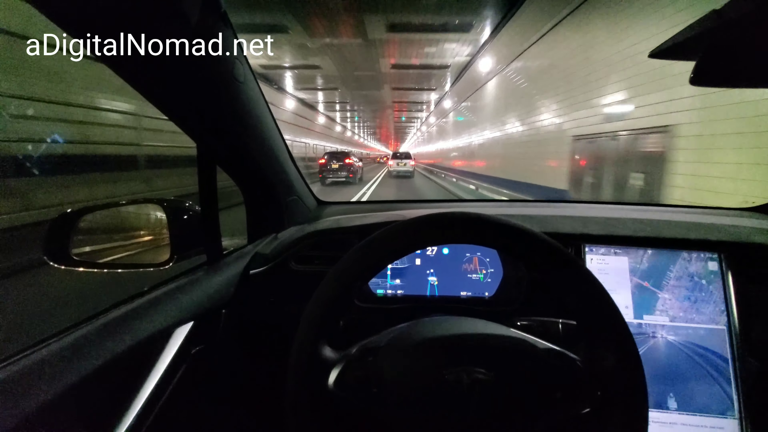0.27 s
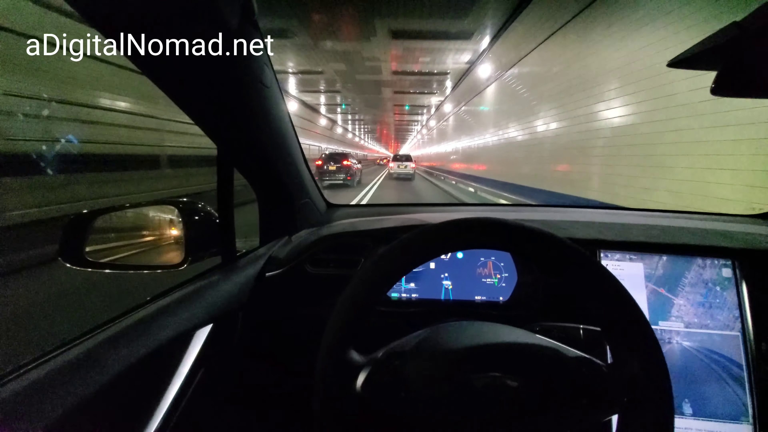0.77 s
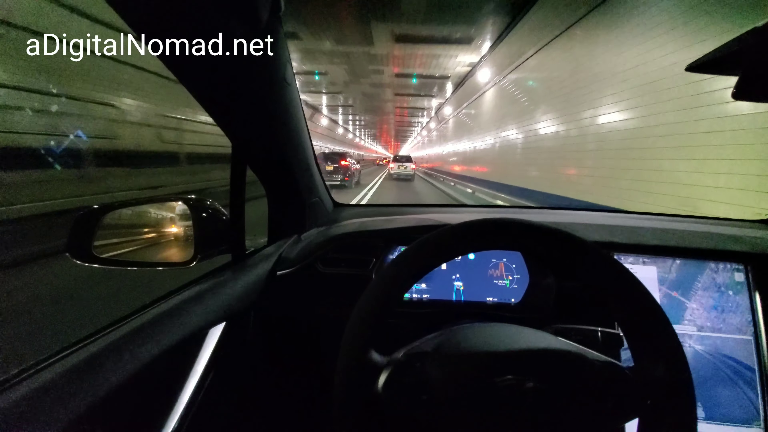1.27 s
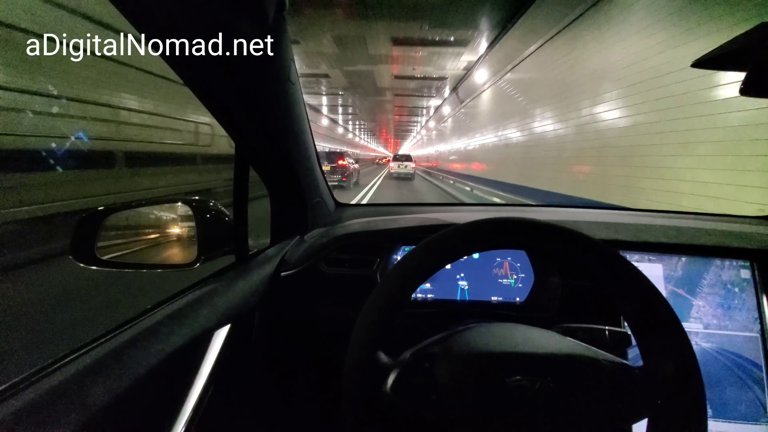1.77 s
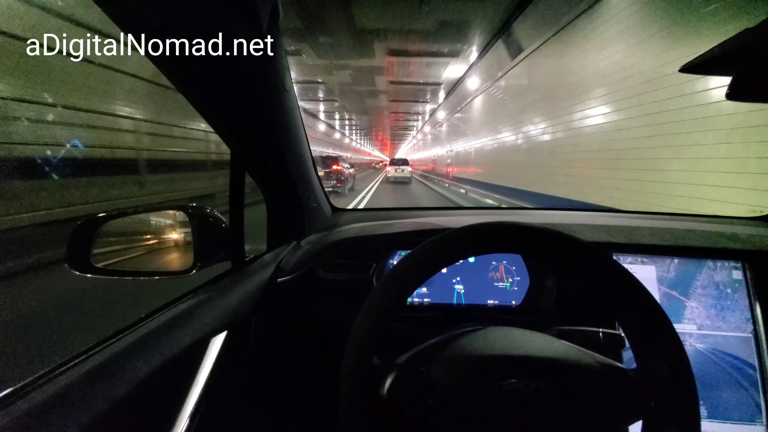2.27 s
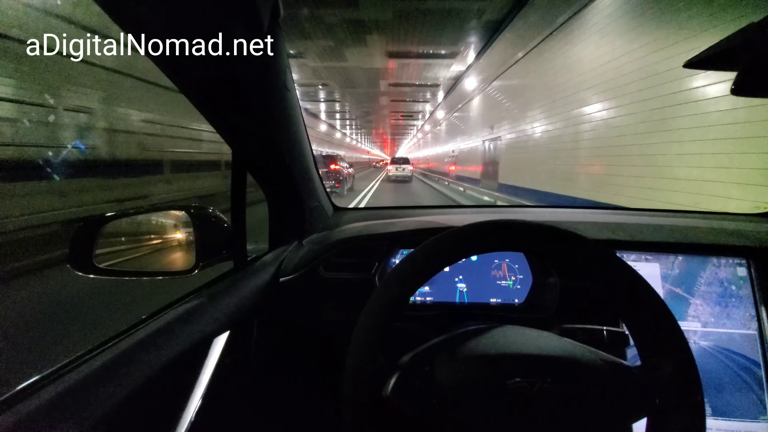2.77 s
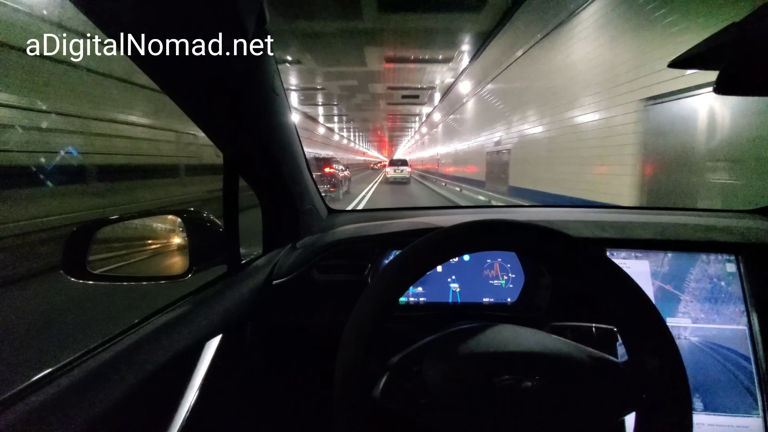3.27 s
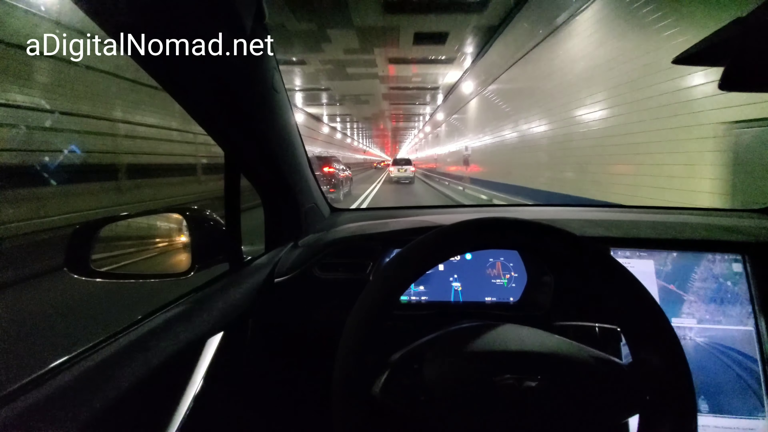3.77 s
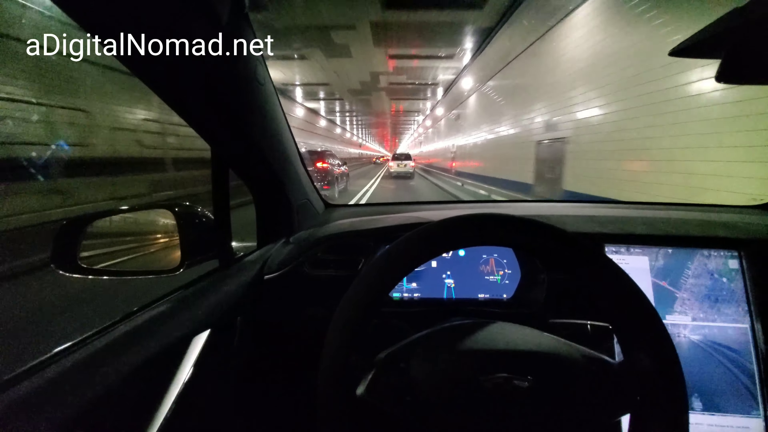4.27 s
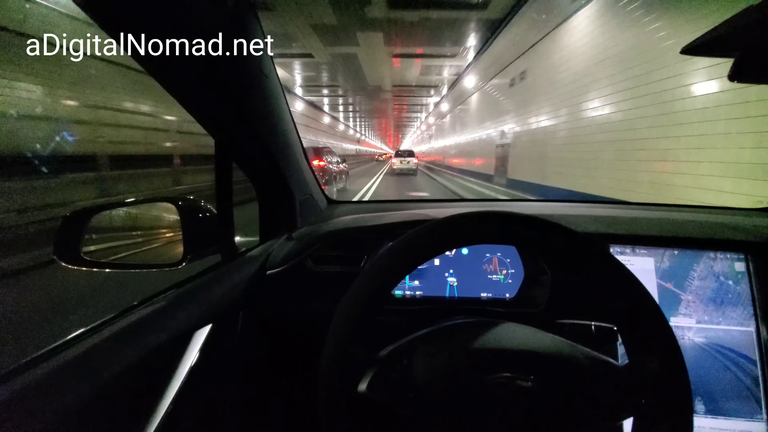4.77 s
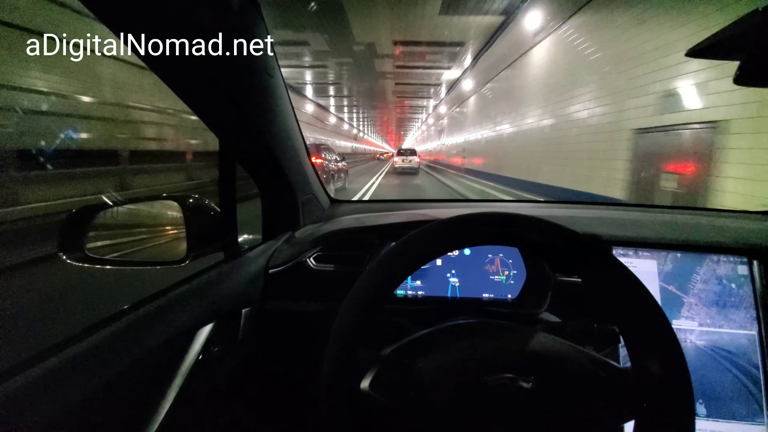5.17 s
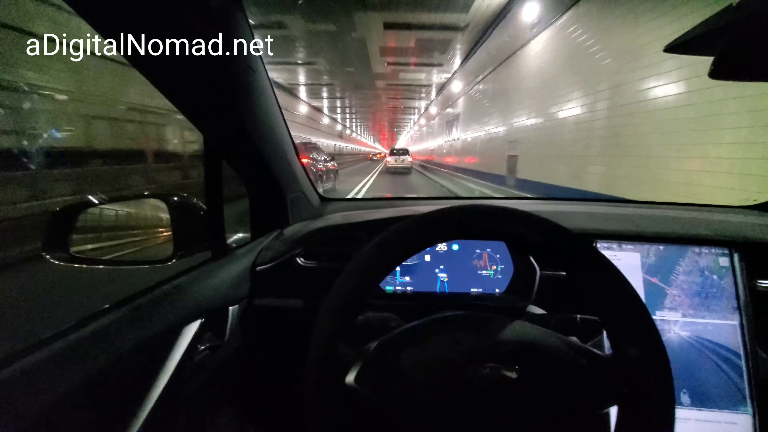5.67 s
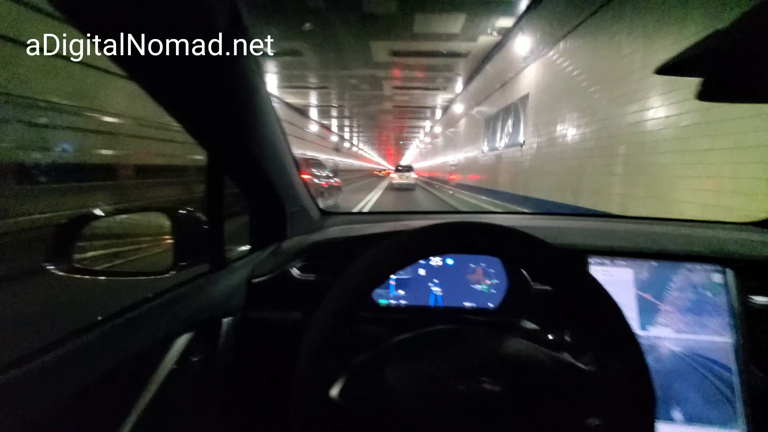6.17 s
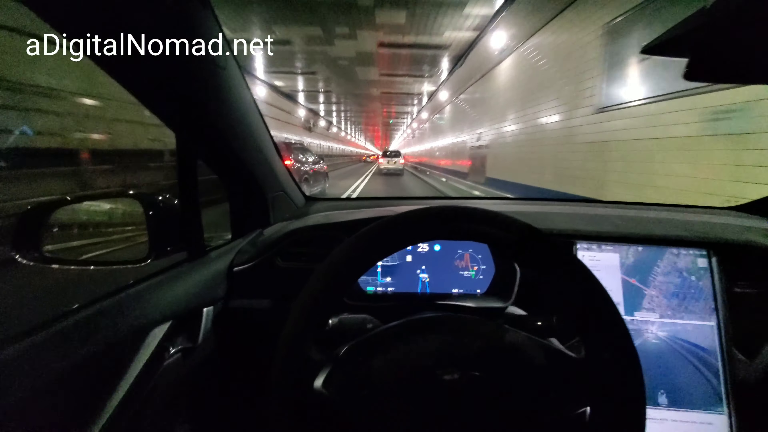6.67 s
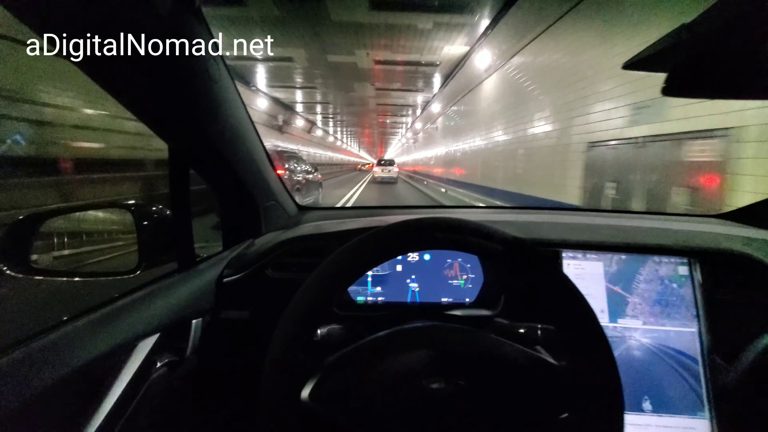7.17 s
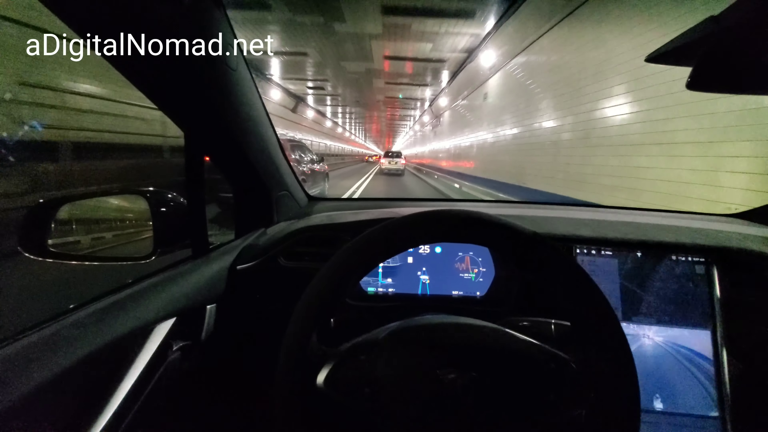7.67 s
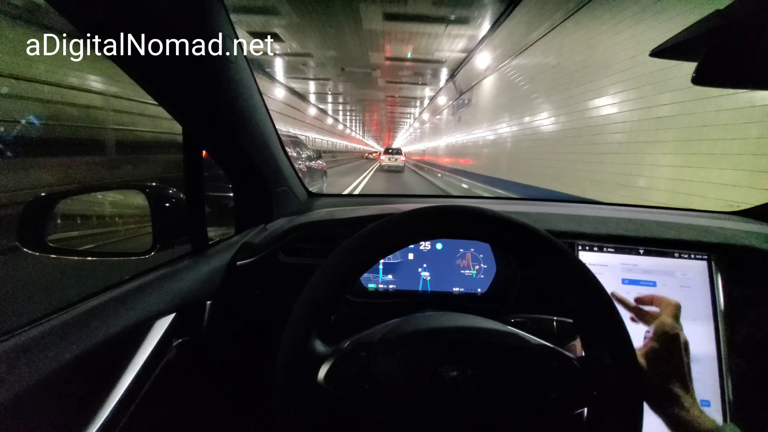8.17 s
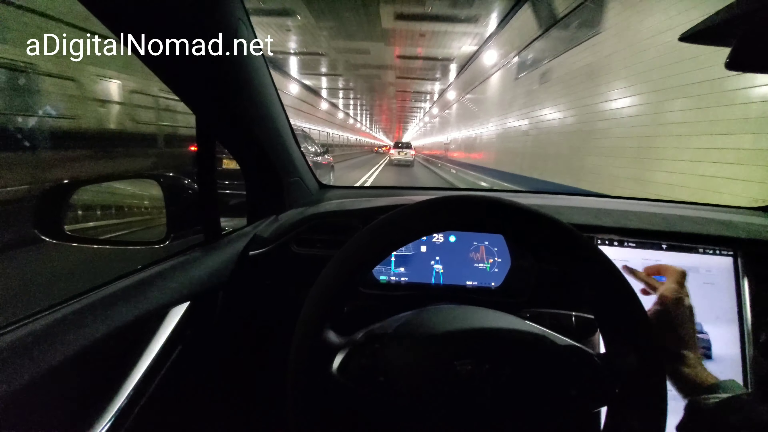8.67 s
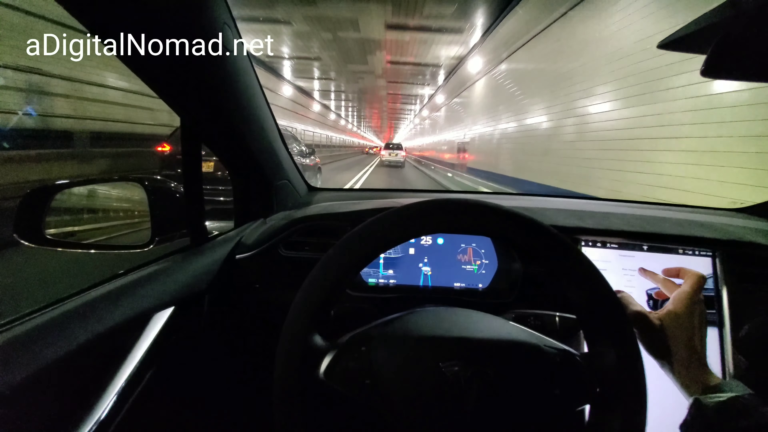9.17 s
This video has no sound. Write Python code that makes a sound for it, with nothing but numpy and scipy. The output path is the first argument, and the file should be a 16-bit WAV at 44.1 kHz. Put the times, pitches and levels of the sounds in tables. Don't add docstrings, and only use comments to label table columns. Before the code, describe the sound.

Inside the cabin of a quiet electric car rolling steadily through a tunnel. A deep, uneven rumble starts strongly and eases within half a second; under it a low hum near 105 Hz wavers, with faint higher tones, while soft muffled tyre roar reflects off the walls. Faint damp hiss comes and goes. A small low bump falls at 2.5 s. At 4.65 to 5.1 s front and rear wheels cross a loose steel cover: two short metallic rattles with a low thud. At 5.56 to 6.0 s a hard joint gives the loudest moment, clustered deep thumps with dull slaps and wet hiss. Sharp plastic ticks snap near the right side at 6.22 s, followed by a brief cloth brush. A lighter cover knocks and chatters twice from 6.5 to 7 s, ringing away. Hum and rumble continue, rising slightly in pitch, until 9.4 s.

```python
import sys
import numpy as np
from scipy import signal
from scipy.io import wavfile
from scipy.ndimage import uniform_filter1d

SR = 44100
rng = np.random.default_rng(int(sys.argv[2]) if len(sys.argv) > 2 else 0)


def volts_from_decibels(level):
    exponent = np.asarray(level, float) / 20
    return 10 ** exponent


def unload_wav(signal):
    wavfile.write(
        sys.argv[1],
        SR,
        np.round(np.clip(np.atleast_2d(signal).T, -1, 1) * 32767).astype(np.int16),
    )


N = 415422

# f/Hz, density/dB
DEEP = [(11, -39.5), (18, -13), (38, 6.5), (64, -5), (83, -32.5), (140, -120)]
BOOM = [(35, -33), (60, -2), (80, 2), (112, -6.5), (151, -3), (183, -21), (220, -16.5), (290, -44),
        (480, -120)]
ROAR = [(100, -31.5), (170, -3), (252, -5), (280, 2.5), (312, -10.5), (372, -6.5), (469, -12.5),
        (574, -12.5), (666, -19.5), (815, -14.5), (1290, -19.5), (1940, -22), (3240, -29.5), (4300, -39),
        (5590, -74), (9460, -120)]
HISS = [(4000, 2.5), (4500, -8.5), (6500, -7), (7800, -7.5), (8700, -7.5), (10500, -7.5), (12800, -6),
        (14700, 0), (16500, -3)]
RATTLE = [(820, -45.5), (1400, 0.5), (1510, -2.5), (2280, -0.5), (3060, -3.5), (4000, -9), (5200, -57),
          (8800, -120)]
DULL = [(110, -27), (180, 2.5), (296, -8.5), (407, 3.5), (504, -10), (623, -2.5), (1500, -12.5),
        (1950, -38), (3300, -120)]
BRIGHT = [(2290, -42.5), (3900, 0.5), (5430, 2), (6010, -1), (7760, -32), (8000, -21), (10400, -48),
          (17600, -120)]
RUB = [(1470, -32), (2500, -7), (2760, -7), (4790, -10), (6270, -11), (9480, -6), (15600, -22)]
SELF_NOISE = [(4000, -3), (6900, -1), (7600, -5.5), (8500, -1.5), (11000, -9.5), (14700, -1), (16500, 0.5)]
# f/Hz, left-right likeness/1
LIKENESS = [(30, .999), (45, 0.98), (70, 0.99), (130, 1), (290, 0.76), (450, 0.68), (740, 0.35),
            (1250, -0.42), (1900, 0.11), (3100, 0.025), (6820, -0.063), (15000, 0.32)]
# f/Hz, L-R level/dB
LEAN = [(60, -0.5), (130, 3), (290, 1), (640, 2), (1410, 2.5), (3100, -0.5), (6820, 5), (10000, -3.5),
        (15000, 4.5)]

# t/s, level/dB
ROAD = [(0.0, -38), (0.44, -33), (0.66, -35.5), (1.49, -33.5), (2.2, -33.5), (2.86, -31), (3.04, -36),
        (3.28, -34), (4.5, -33.5), (4.91, -31), (5.6, -33), (6.2, -36), (6.79, -31.5), (7.22, -40),
        (7.63, -35.5), (7.92, -38), (8.55, -32), (9.42, -35)]
# t/s, level/dB
WALLS = [(0.0, -40.5), (1.9, -40.5), (2.9, -39), (4.1, -40), (5.3, -37.5), (6.4, -43), (7.2, -41.5),
         (9.42, -41)]
# f/Hz, width/Hz, level/dB
ROAR_PEAKS = [(742, 130, 5.5), (1840, 590, 1.5), (2410, 130, -2), (3020, 140, 2)]
# t/s, level/dB
HEAVE = [(0.0, -14.5), (0.13, -31), (0.39, -17), (0.68, -19), (2.41, -24), (3.07, -29), (3.3, -22),
         (3.7, -25), (3.93, -27), (4.48, -28), (4.72, -29), (5.27, -24), (5.67, -15.5), (5.87, -16),
         (5.98, -12.5), (6.48, -24.5), (7.63, -24.5), (8.05, -25.5), (8.55, -24), (8.84, -28.5),
         (9.08, -38.5)]
# start t/s, hiss level/dB, length/s
DAMP = [(0.64, -63, .1), (0.8, -60.5, 0.37), (1.3, -63, 0.16), (1.81, -75, .1), (3.3, -75, 0.3),
        (3.95, -70.5, 0.36), (4.5, -70, 0.75), (5.59, -58.5, 0.33), (5.95, -62, 0.94), (7.18, -69.5, 0.076),
        (7.4, -63.5, 0.39), (7.95, -67.5, 0.72), (8.8, -72.5, 0.3)]
# t/s, hiss level/dB
PUDDLES = [(0.39, -72), (2.2, -76), (3.01, -68), (3.28, -76), (3.65, -67), (4.5, -65.5), (4.8, -64),
           (5.19, -70), (5.59, -61.5), (5.82, -54), (6.205, -56), (8.46, -62.5), (8.65, -63)]

# t/s, f/Hz
SPEED = [(0, 35.7), (1.8, 35.6), (2.6, 35.4), (4.0, 35.1), (5.8, 35.0), (6.4, 35.6), (7.0, 36.3),
         (8.0, 36.8), (8.3, 37.3), (8.9, 37.8), (9.42, 38.6)]
# t/s, 3rd order level/dB
HUM = [(0.0, -23), (0.5, -21), (1.15, -22.5), (1.78, -28.5), (2.3, -35.5), (2.54, -25.5), (2.9, -37),
       (3.7, -28.5), (4.17, -30), (4.55, -45.5), (5.45, -27.5), (6.19, -30), (6.75, -36), (6.87, -27.5),
       (7.48, -21.5), (8.21, -26), (8.58, -33), (9.42, -32)]
# t/s, level/dB, length/s
JOLTS_3RD = [(3.02, -27, .03), (4.732, -26.5, 0.02), (5.588, -31, 0.026), (5.872, -22, .05),
             (7.865, -21, 0.019)]
JOLTS_4TH = [(0.08, -24, 0.042), (0.5, -31.5, 0.083), (1.28, -32, 0.47), (2.8, -26.5, 0.024),
             (3.3, -29.5, .1), (3.68, -34.5, .12), (4.25, -26.5, .03), (4.72, -30.5, 0.64),
             (5.85, -37, .05), (6.79, -30.5, 0.21), (7.82, -28.5, .05), (8.1, -40, 0.032),
             (8.26, -26, 0.069), (8.8, -31, 0.41)]
JOLTS_8TH = [(0.5, -39, 0.044), (1.15, -37, 0.028), (2.13, -40.5, 0.12), (2.3, -38, 0.045),
             (2.939, -41.5, 0.016), (3.15, -32.5, 0.28), (4.07, -37, 0.019), (6.64, -45, 0.041),
             (8.1, -40, 0.14), (8.58, -41.5, 0.045)]
# level/dB, rate/(1/s)
WOBBLES = [
    (2.0, 7),
    (3.5, 10),
    (2, 7.9),
]
# start t/s, level/dB, length/s
RINGING = [(0.37, -49, 0.49), (1.39, -49.5, 0.088), (2.8, -44.5, 0.55), (4.95, -41.5, 0.16),
           (5.61, -48.5, .05), (7.6, -49, 1), (8.58, -45, .85)]
# f/Hz, width/Hz
RING_MODES = [(377, 16)]

# t/s, peak level/dB, fall time/s
SLAPS = [
    (5.563, -32, 0.012),
    (5.631, -38.5, 0.012),
    (5.829, -30.5, 0.01),
    (5.932, -41, .005),
    (8.465, -49, .008),
]
# t/s, ring level/dB, ring f/Hz, crack level/dB, L-R level/dB
TICKS = [(6.2165, -40, 10500, -44, -12), (6.2272, -24, 9000, -23, -13), (6.2300, -33, 2200, -48, -6),
         (6.2347, -34, 9500, -29, -12), (6.2361, -19, 2200, -28, -9), (6.2362, -25, 4700, -38, -9),
         (6.2364, -36, 600, -34, -9), (6.2542, -29, 1300, -28, -9)]
# t/s, level/dB
BRUSH = [(6.222, -70), (6.232, -56), (6.242, -51), (6.252, -43), (6.265, -40), (6.273, -44), (6.276, -60)]

# edge t/s, peak t/s, rattle level/dB, dull share/dB, bright share/dB
COVERS = [
    [(4.645, 4.73, -34.5, 2.5, -17.5), (4.87, 4.99, -39, 7, -16)],
    [(6.53, 6.64, -39.5, 9.5, -13), (6.86, 6.95, -41, 2, -23)],
]
# f/Hz, width/Hz, front axle level/dB, rear axle level/dB, fade/(dB/s)
COVER_PEAKS = [
    [(416, 51, 7, 6, -3), (604, 55, 5, 10, 13), (686, 55, 7.5, 4.5, 2.5), (1015, 49, 13, 9, 26),
     (1240, 35, 12.5, 9.5, 33), (1520, 60, 5, 10.5, 17), (1948, 95, 10.5, 13.5, 2), (2120, 86, 5, 6, 7),
     (2540, 160, 7.5, 8.5, -3), (2900, 33, 4, 10, 35), (3056, 150, 14, 15, 26), (3670, 140, 3.5, 7.5, 18),
     (6000, 80, 6, 7, 24)],
    [(673, 60, -2, 8.5, 20), (856, 80, 5, -2, 27), (1060, 88, 8, -2, 60), (1200, 14, -1, 15, 2),
     (1500, 60, -2, 8.5, 9), (1930, 130, 11.5, 10, -2), (2470, 41, 16, 10.5, 31), (2634, 57, 11, 8.5, -2),
     (2810, 55, 7, 9, 6), (3020, 78, 0, 9.5, 20), (3540, 150, 4, 5, 12.5), (4340, 50, 13, 6, 40),
     (5110, 50, 11, 5, 60), (5880, 98, 10, 14, 60)],
]
REAR_AXLE_S = [4.86, 6.82]
# front climb/(dB/s), rear climb/(dB/s)
PEAKS_CLIMB_DB_PER_S = ((3, 23), (63, 40))
# loss/dB, fall/(dB/s)
ECHOES = [
    [(4, 31), (0.5, 35)],
    [(3.5, 29), (2, 29)],
]

# t/s, peak level/dB, f/Hz, t60/s
BLOWS = [(2.49, -20.5, 70, .6), (4.729, -16.5, 100, 0.15), (5.029, -9.5, 105, 0.1),
         (5.564, -7, 62.6, 0.088), (5.59, -6, 101.3, 0.13), (5.652, -1, 55.5, 0.056),
         (5.804, -36, 82.6, 0.14), (5.832, -9, 58.3, 0.15), (5.856, -5.5, 79.3, 0.2),
         (5.918, -6, 56.5, 0.37), (5.965, -2.5, 50.2, 0.085), (6.875, -15.5, 110.7, 0.24),
         (6.905, -14, 107.4, 0.28)]
# t/s, peak level/dB, f/Hz, t60/s
KNOCKS = [(6.529, -22.5, 166, 0.23), (6.515, -39, 530, 0.13), (6.575, -27, 262, 0.14),
          (6.789, -20.5, 158, 0.3), (6.795, -34, 602, 0.28), (6.795, -46, 1130, .06),
          (7.263, -43, 890, 0.027)]

ROAR_FOLLOWS, HEAVE_FOLLOWS = 0.033, 0.13
GLASS_CUT_HZ = 3670
HEAVE_REST_DB, HEAVE_RISE_DB_PER_S, HEAVE_FALL_DB_PER_S = -32, 111, 140
DAMP_RISE_DB_PER_S, DAMP_FALL_DB_PER_S = 75.5, 85.5
PUDDLE_RISE_DB_PER_S, PUDDLE_FALL_DB_PER_S = 249, 193

ORDERS_HEARD, ORDER_SHARES_DB = (3, 4, 8), (-0.4, -2.5, -8.0)
REST_4TH_DB, REST_8TH_DB = -46, -45
JOLT_RISE_DB_PER_S, JOLT_FALL_DB_PER_S = 90, 72.5
PORT_LAG_RAD = 0.08
RING_REST_DB, RING_RISE_DB_PER_S, RING_FALL_DB_PER_S = -51, 41, 22

COVER_BEFORE_S, COVER_AFTER_S = 0.18, 0.65
EDGE_LOSSES_DB, EDGES_DB_PER_S = (8, 2), (1000, 450)
DULL_LEADS_S, DULL_FADES_DB_PER_S = (0.0065, 0.05), (7, 70)
DULL_EDGE_LOSS_DB, DULL_ECHO_LOSS_DB = 4.5, 3.5
BRIGHT_EDGE_LOSS_DB, BRIGHT_DIES_DB_PER_S = 11, 15.5
FALLS_DB_PER_S, HOLDS_S = (58, 52), (0.0085, 0.04)

KNOCK_LEAN_DB, TRIM_DB = 5, 4.5
SELF_NOISE_DB, CUTOFF_HZ = -74.5, 15480
PORT_DIP, PORT_DIP_HZ = 0.4, 7600
GAIN_KNEE_DB, GAIN_SQUEEZE, GAIN_WINDOW_S = -16.5, 1.02, 0.19
GAIN_ATTACK_S, GAIN_RELEASE_DB_PER_S = 0.12, 9


def rms_one(x):
    return x / np.sqrt(np.mean(x ** 2) + 1e-20)


def in_time(rows):
    s, *columns = np.transpose(rows)
    return [np.interp(np.arange(N) / SR, s, c) for c in columns]


def span_of(start_s, end_s):
    span = slice(int(start_s * SR), int(end_s * SR))
    return span, signal.windows.tukey(span.stop - span.start, 0.12)


def swells(rows, rise_db_per_s, fall_db_per_s, rest_db=-120):
    t = np.arange(0, N + 64, 64) / SR
    power = volts_from_decibels(2 * (rest_db + 0 * t))
    for s, db, *hold in rows:
        rise_db = rise_db_per_s * np.maximum(s - t, 0)
        fall_db = fall_db_per_s * np.maximum(t - s - sum(hold), 0)
        power = power + volts_from_decibels(2 * (db - rise_db - fall_db))
    return np.interp(np.arange(N) / SR, t, 10 * np.log10(power))


def at_hz(points, hz):
    f, value = np.transpose(points)
    return np.interp(np.log(hz), np.log(f), value)


def drift(rate, size):
    r = np.exp(-80 * np.pi * rate / SR)
    sparse = rng.standard_normal(size // 40 + 2002)
    slow = signal.lfilter([1], [1, -2 * r, r * r], sparse)[2000:]
    return np.interp(np.arange(size) / 40, np.arange(len(slow)), rms_one(slow))


def resonance(x, hz, width_hz):
    r = np.exp(-np.pi * width_hz / SR)
    zeros = np.array([1, 0, -1]) * (1 - r * r) / 2
    return signal.lfilter(zeros, [1, -2 * r * np.cos(2 * np.pi * hz / SR), r * r], x)


def with_peaks(x, peaks):
    for hz, width_hz, db in peaks:
        x = x + (volts_from_decibels(db) - 1) * resonance(x, hz, width_hz)
    return rms_one(x)


def panned(half_db):
    return volts_from_decibels(np.array([[half_db], [-half_db]]))


def sides(mid, side, hz):
    alike = np.clip(at_hz(LIKENESS, hz), -1, 1)
    stereo = np.sqrt(1 + alike) * mid + np.sqrt(1 - alike) * side * [[1], [-1]]
    return stereo * panned(at_hz(LEAN, hz) / 2)


def cabin_noise(spectrum, patchy_db, flicker, size=N):
    low_hz, top_hz = spectrum[0][0], min(spectrum[-1][0], 0.45 * SR)
    edges = np.geomspace(low_hz, top_hz, 2 + int(4 * np.log2(top_hz / low_hz)))
    white = rng.standard_normal((2, 2, size + 8000))
    together = drift(flicker / 4, size)
    out = 0
    for k, (low, high) in enumerate(zip(edges, edges[1:])):
        hz = np.sqrt(low * high)
        if at_hz(spectrum, hz) < -75:
            continue
        band = signal.butter(2, [low, high], "band", fs=SR, output="sos")
        mid, side = signal.sosfilt(band, white[k % 2])[:, 8000:]
        gain = volts_from_decibels(at_hz(spectrum, hz) + patchy_db * (0.92 * together + drift(flicker, size)))
        out = out + gain * sides(mid, side, hz)
    return rms_one(out)


def road():
    boom_db, = in_time(ROAD)
    swing_db = boom_db - boom_db.mean()
    roar_db = in_time(WALLS)[0] + ROAR_FOLLOWS * swing_db
    heave_db = swells(HEAVE, HEAVE_RISE_DB_PER_S, HEAVE_FALL_DB_PER_S, HEAVE_REST_DB) + HEAVE_FOLLOWS * swing_db
    damp_db = swells(DAMP, DAMP_RISE_DB_PER_S, DAMP_FALL_DB_PER_S)
    puddle_db = swells(PUDDLES, PUDDLE_RISE_DB_PER_S, PUDDLE_FALL_DB_PER_S)
    wet = np.hypot(volts_from_decibels(damp_db), volts_from_decibels(puddle_db))

    heave = volts_from_decibels(heave_db - 0.5) * cabin_noise(DEEP, patchy_db=-1.0, flicker=5.5)
    boom = volts_from_decibels(boom_db + 5.5) * cabin_noise(BOOM, patchy_db=-0.84, flicker=11.0)
    roar = volts_from_decibels(roar_db + 3.0) * with_peaks(cabin_noise(ROAR, patchy_db=1.04, flicker=3.1), ROAR_PEAKS)
    roar = signal.sosfilt(signal.butter(5, GLASS_CUT_HZ, fs=SR, output="sos"), roar)
    hiss = volts_from_decibels(2.5) * wet * cabin_noise(HISS, patchy_db=0.3, flicker=8.0)
    return heave + boom + roar + hiss


def hum():
    turns = np.cumsum(in_time(SPEED)[0] * (1 + 0.0041 * drift(4.5, N))) / SR
    lag = PORT_LAG_RAD * np.array([[1], [-1]])
    grid = np.minimum(np.arange(0, N + 64, 64), N - 1)
    rests_db = (in_time(HUM)[0][grid], REST_4TH_DB, REST_8TH_DB)
    all_jolts = (JOLTS_3RD, JOLTS_4TH, JOLTS_8TH)
    out = 0
    for order, jolts, rest_db, share_db, (wobble_db, rate) in zip(
            ORDERS_HEARD, all_jolts, rests_db, ORDER_SHARES_DB, WOBBLES):
        db = swells(jolts, JOLT_RISE_DB_PER_S, JOLT_FALL_DB_PER_S, rest_db)
        level = np.sqrt(2) * volts_from_decibels(db + share_db + wobble_db * drift(rate, N))
        out = out + level * np.sin(2 * np.pi * order * turns + lag) * panned(0.4)
    ring_db = swells(RINGING, RING_RISE_DB_PER_S, RING_FALL_DB_PER_S, RING_REST_DB) - 4.5
    for mode_hz, width_hz in RING_MODES:
        air = resonance(rng.standard_normal((2, N)), mode_hz, width_hz)
        mid, side = rms_one(resonance(air, mode_hz, 2 * width_hz))
        out = out + volts_from_decibels(ring_db) * sides(mid, side, mode_hz)
    return out


def slaps():
    t, shape = np.arange(N) / SR, 0
    for s, db, length in SLAPS:
        shape = shape + volts_from_decibels(db - 20.5) * np.exp(-np.maximum(t - s, 1.2 * (s - t)) / length)
    white = rng.standard_normal((2, N))
    puff = white + 1.9 * resonance(white, 14300, 2500) * [[1.3], [0.7]]
    arch = 2.7 * resonance(white, 1300, 1200) + 41.0 * resonance(white, 600, 600)
    return shape * (puff + arch)


def trim():
    out, t = np.zeros((2, N)), np.arange(400) / SR
    cracks = rng.standard_normal((len(TICKS), 2, 400))
    for (s, ring_db, hz, crack_db, pan_db), crack in zip(TICKS, cracks):
        ring = volts_from_decibels(ring_db) * np.sin(2 * np.pi * hz * t) * np.exp(-t * hz / 1.6)
        snap = volts_from_decibels(crack_db) * signal.lfilter([0.6, 0.5], [1], crack) * np.exp(-t / 0.0005)
        out[:, round(s * SR):][:, :400] += (ring + snap) * panned(pan_db / 2)
    span, fade = span_of(BRUSH[0][0], BRUSH[-1][0])
    rub = cabin_noise(RUB, patchy_db=1.2, flicker=60, size=len(fade)) * volts_from_decibels(np.array([[-12.0], [3.0]]))
    out[:, span] += fade * volts_from_decibels(in_time(BRUSH)[0][span]) * rub
    return out


def blows():
    out, t = np.zeros((2, N)), np.arange(SR // 2) / SR
    for s, db, hz, t60 in list(BLOWS) + list(KNOCKS):
        swing = volts_from_decibels(db - 60 * t / t60 + 2.0) * (1 - np.exp(-t / 0.00088)) * np.sin(2 * np.pi * hz * t)
        lean_db = KNOCK_LEAN_DB * (hz > 300)
        out[:, round(s * SR):][:, :len(t)] -= swing * panned(lean_db)
    return out


def axle(t, edge_s, peak_s, edge_loss_db, fall_db_per_s, hold_s, edge_db_per_s, echo_loss_db, echo_db_per_s):
    climb = edge_loss_db * np.maximum(peak_s - t, 0) / (peak_s - edge_s)
    climb = climb + edge_db_per_s * np.maximum(edge_s - t, 0)
    after = np.maximum(t - peak_s - hold_s, 0)
    return -climb - np.minimum(fall_db_per_s * after, echo_loss_db + echo_db_per_s * after)


def cover_levels(t, k):
    steep, power = EDGES_DB_PER_S[k], 0
    for (edge, peak, db, dull_share, bright_share), fall, hold, (echo_loss, echo_fall) in zip(
            COVERS[k], FALLS_DB_PER_S, HOLDS_S, ECHOES[k]):
        rattle_db = axle(t, edge, peak, EDGE_LOSSES_DB[k], fall, hold, steep, echo_loss, echo_fall)
        bright_db = axle(t, edge, peak, BRIGHT_EDGE_LOSS_DB, fall, hold, steep, echo_loss, echo_fall)
        bright_db = bright_share + bright_db - BRIGHT_DIES_DB_PER_S * np.maximum(t - peak - hold, 0)
        dull_db = dull_share + axle(t, edge, peak - DULL_LEADS_S[k], DULL_EDGE_LOSS_DB,
                                    fall + DULL_FADES_DB_PER_S[k], hold, steep,
                                    echo_loss + DULL_ECHO_LOSS_DB, echo_fall)
        power = power + volts_from_decibels(2 * (db + np.array([rattle_db, bright_db, dull_db])))
    return np.sqrt(power)


def covers():
    out = np.zeros((2, N))
    for k, (rows, rear_s) in enumerate(zip(COVERS, REAR_AXLE_S)):
        span, fade = span_of(rear_s - 2 * COVER_BEFORE_S, rear_s + COVER_AFTER_S)
        t, size = np.arange(span.start, span.stop) / SR, len(fade)
        rattle, bright, dull = cover_levels(t, k)
        chatter = rattle * cabin_noise(RATTLE, patchy_db=0.6, flicker=25, size=size)
        chatter = chatter + volts_from_decibels(2.5) * dull * cabin_noise(DULL, patchy_db=1.2, flicker=15, size=size)
        chatter = chatter + volts_from_decibels(-1.5) * bright * cabin_noise(BRIGHT, patchy_db=0.0, flicker=27, size=size)

        rear = np.clip((t - rear_s) / 0.051 + 0.5, 0, 1)
        front_age, rear_age = (np.maximum(t - row[1], 0) for row in rows)
        front_wait, rear_wait = (climb * np.maximum(row[1] - t, 0)
                                 for row, climb in zip(rows, PEAKS_CLIMB_DB_PER_S[k]))
        for hz, width_hz, front_db, rear_db, fades in COVER_PEAKS[k]:
            late = hz > 1500
            front_lift = np.maximum(front_db - fades * front_age - late * front_wait, 0)
            rear_lift = np.maximum(rear_db - fades * rear_age - late * rear_wait, 0)
            lift_db = (1 - rear) * front_lift + rear * rear_lift
            chatter = chatter + (volts_from_decibels(lift_db) - 1) * resonance(chatter, hz, width_hz)
        out[:, span] += fade * volts_from_decibels(-4.5) * chatter
    return out


def scene():
    return road() + hum() + slaps() + volts_from_decibels(TRIM_DB) * trim() + blows() + covers()


def gain_control(x):
    window = int(GAIN_WINDOW_S * SR)
    power = uniform_filter1d(np.mean(x ** 2, axis=0), window, origin=window // 2 - 1)
    over_db = np.maximum(10 * np.log10(power + 1e-12) - GAIN_KNEE_DB, 0)
    creep = GAIN_RELEASE_DB_PER_S * np.arange(N) / SR
    cut_db = np.maximum.accumulate(GAIN_SQUEEZE * over_db + creep) - creep
    r = np.exp(-1 / (GAIN_ATTACK_S * SR))
    return x * volts_from_decibels(-signal.lfilter([1 - r], [1, -r], cut_db))


def top_cut(x):
    return signal.sosfilt(signal.butter(12, 16620, fs=SR, output="sos"), x)


def record(dry):
    x = dry + volts_from_decibels(SELF_NOISE_DB) * cabin_noise(SELF_NOISE, patchy_db=-2.0, flicker=5.0)
    capsule = signal.butter(2, 22.0, "high", fs=SR, output="sos")
    x = signal.sosfilt(capsule, x - x[:, :1])
    x = gain_control(x - PORT_DIP * resonance(x, PORT_DIP_HZ, 600))
    x = 1.2 * np.tanh(x / 1.2)
    cut = signal.ellip(10, 0.3, 55, CUTOFF_HZ, fs=SR, output="sos")
    running = signal.sosfilt_zi(cut)[:, None] * x[:, :1]
    x = signal.sosfilt(cut, x, zi=running)[0]
    return top_cut(x)


dry = scene()
out = record(dry)
unload_wav(out)
```